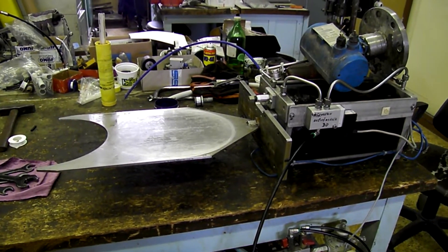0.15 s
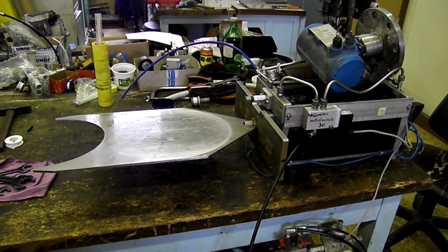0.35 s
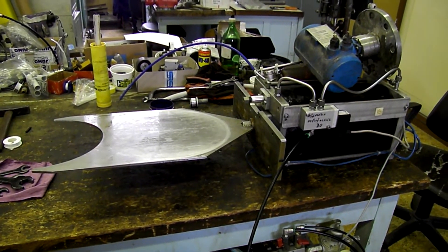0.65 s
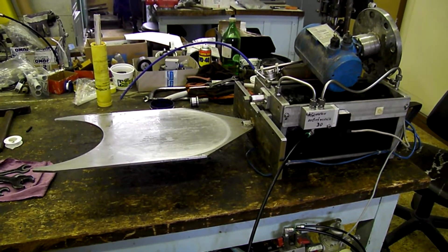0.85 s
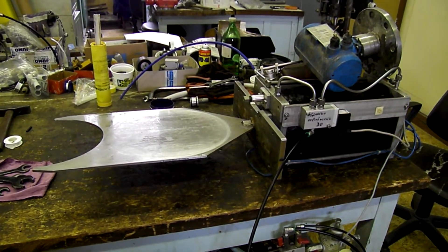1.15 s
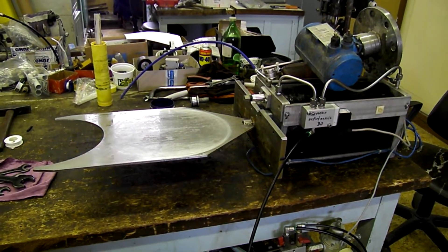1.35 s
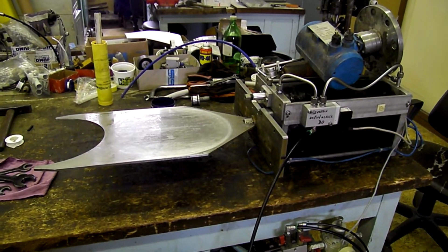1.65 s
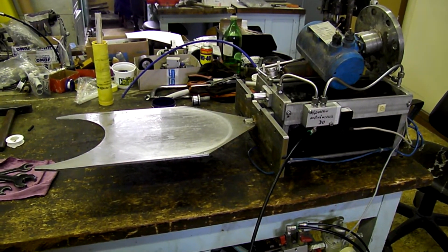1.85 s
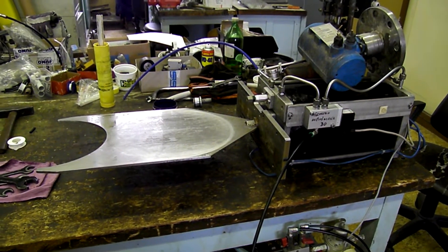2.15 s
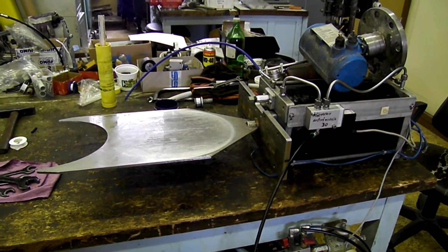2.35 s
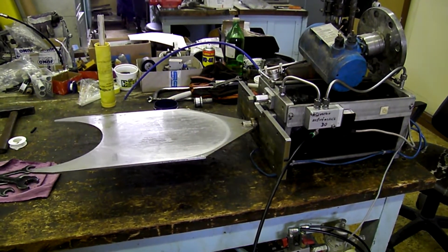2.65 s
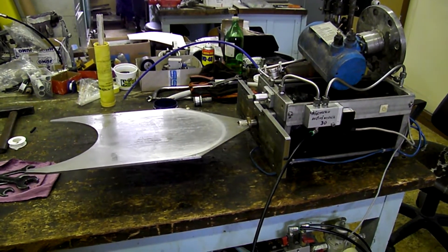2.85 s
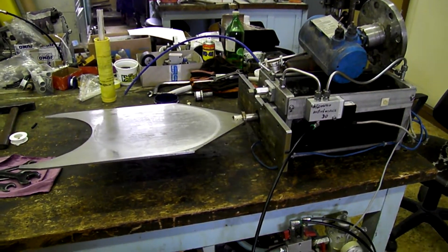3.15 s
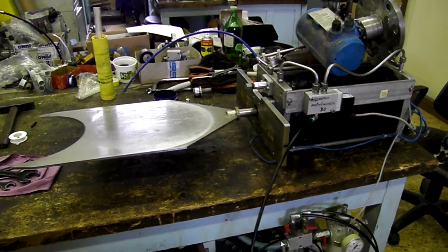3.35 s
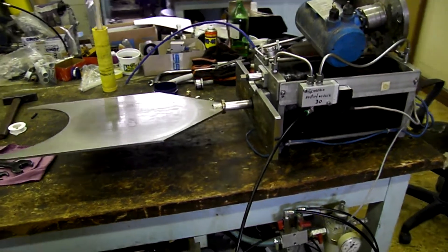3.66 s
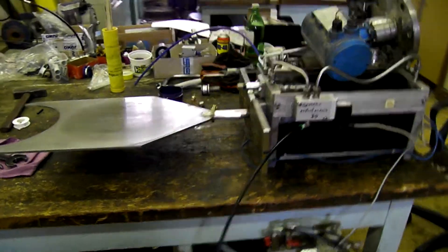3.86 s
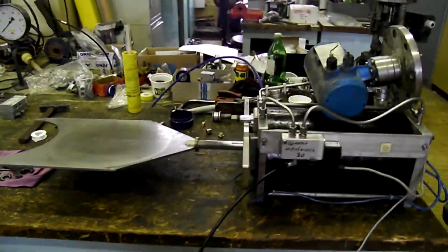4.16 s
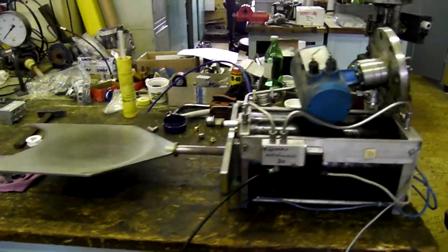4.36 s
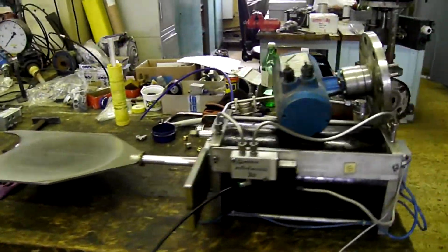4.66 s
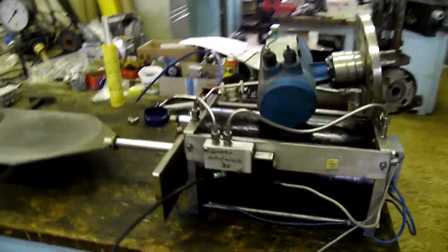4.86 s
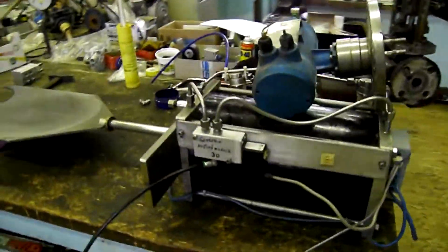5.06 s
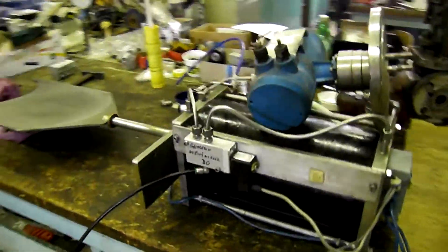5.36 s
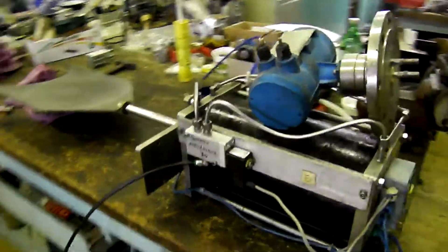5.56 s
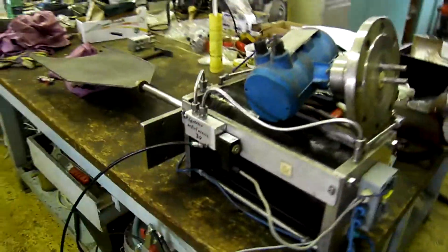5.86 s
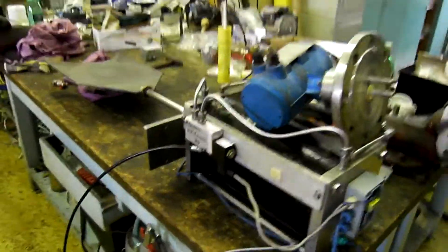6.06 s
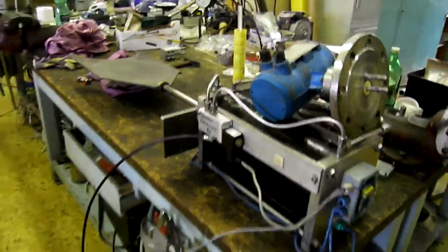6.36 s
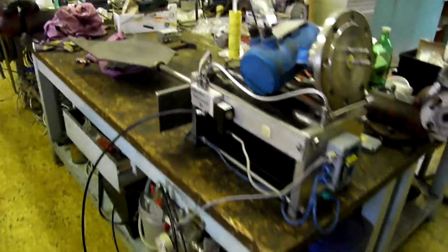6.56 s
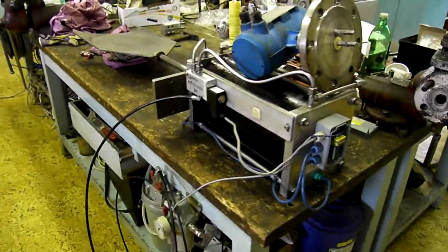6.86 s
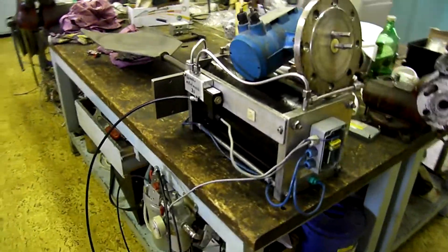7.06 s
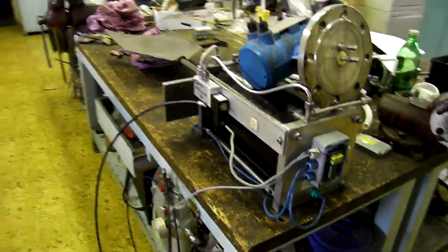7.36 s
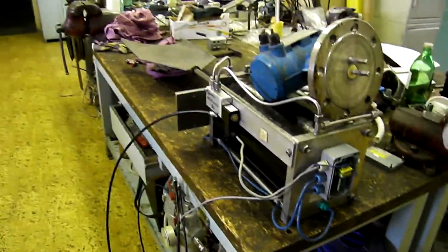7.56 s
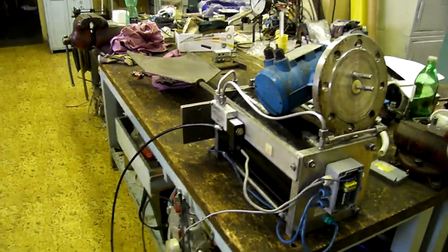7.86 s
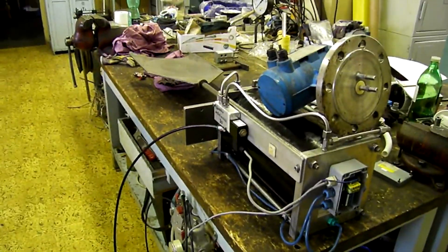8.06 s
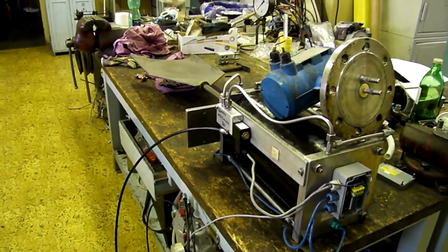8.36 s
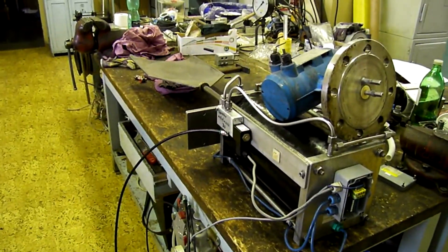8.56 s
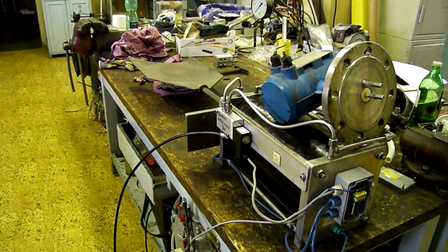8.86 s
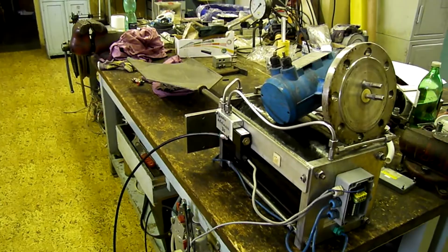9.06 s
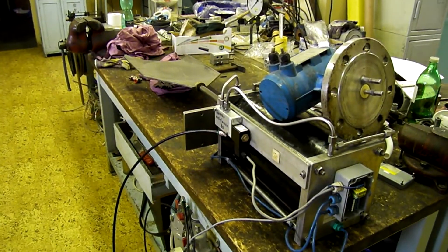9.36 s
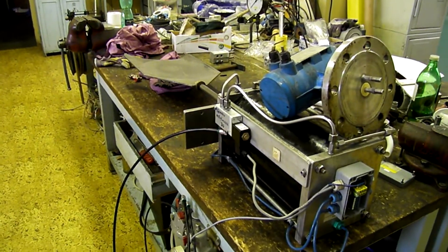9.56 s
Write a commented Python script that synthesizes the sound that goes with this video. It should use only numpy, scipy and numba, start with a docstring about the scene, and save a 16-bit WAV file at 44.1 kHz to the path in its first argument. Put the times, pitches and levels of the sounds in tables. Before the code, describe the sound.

Compressed air bleeds softly from a bench machine with small linkage clicks, against the steady rush of a workshop. After short puffs and a hard valve snap, a loud hissing blast covers the room while the microphone circles nearby. It falls away with a brief ring of pipes. The shop noise returns with breathy whistles, a faint high leak and two low swells near the end.

```python
"""A pneumatic rig cycles on a bench in a noisy, humming workshop. First the last air of one stroke
sighs out, ringing the pipes, while ports whistle and the linkage clicks. Near 2 s come puffs and a
valve click; then a turbulent jet blasts for four seconds as the microphone is carried round it, and a
limiter ducks the shop under the blast. The valve shuts, the hiss dulls with the falling pressure, and
whistles come and go. A thin leak remains, and a low roar swells twice near the end."""
import sys
import numpy as np
from scipy import signal
from scipy.fft import rfft, irfft
from scipy.io import wavfile
from scipy.ndimage import uniform_filter1d
from numba import njit

SR = 44100
rng = np.random.default_rng(int(sys.argv[2]) if len(sys.argv) > 2 else 0)


def wav_record(signal):
    """Record a signal, one row per channel, as 16-bit PCM in the file named by sys.argv[1]."""
    frames = np.transpose(np.atleast_2d(signal))
    bounded = np.clip(frames, -1, 1)
    # unit amplitude maps onto the largest positive 16-bit level
    quanta = np.round(bounded * 32767).astype(np.int16)
    wavfile.write(sys.argv[1], SR, quanta)


N = 428652
TIME = np.arange(N) / SR
FRAME_S, BIN_HZ = np.arange(N // 256 + 5) * 256 / SR, np.fft.rfftfreq(1024, 1 / SR)

# Noise spectra. Each row: frequency in Hz, relative spectral density in dB.
BLEED_SPECTRUM = [(150, -30), (600, -13), (1100, -12.5), (1800, -0.5), (2800, 2), (4200, 2), (6000, 0),
                  (8000, -8), (11000, -18), (15500, -37)]
SHOP_SPECTRUM = [(15, -67), (25, -52), (116, -26.5), (152, -19), (291, -1.5), (413, -6.5), (788, -2),
                 (1500, -6.5), (2440, -8), (3380, -11.5), (4420, -11.5), (6630, -19.5), (7580, -20),
                 (8450, -24), (15700, -38)]
JET_SPECTRUM = [(30, -39), (150, -35), (350, -28), (750, -14), (1050, -14.5), (1280, -8.5), (1500, -10),
                (2400, -6), (3900, -2.5), (5200, 0.5), (6500, -1), (9500, -4), (14200, -6), (15700, -6)]
LEAK_SPECTRUM = [(3000, -20), (7000, -22), (12000, 8), (15700, 5.5)]
ROAR_SPECTRUM = [(30, -34), (95, -36), (160, -8), (300, 1), (600, -1), (1200, -5.5), (2600, -12),
                 (5000, -21), (10000, -39)]
# Low-pressure air bleeding through the pipes. Each row: start in s, attack in s, time open in s,
# level in dB, emptying time in s, drive on the pipes in dB above the hiss.
SIGHS = [(-.05, .02, .42, -29, 0.8, 0), (.37, .02, .5, -44, .45, 10), (.66, 0.018, .7, -32, .3, -3),
         (1.75, .02, .2, -32.5, .15, -12), (2.016, .025, .3, -19, 0.13, -1.5),
         (6.177, .048, 3, 0.5, .24, 4)]
# Pipe resonances. Each row: frequency in Hz, half-width in Hz, relative level in dB.
PIPE_MODES = [(1717, 50, -8), (1877, 34, -1.5), (2015, 27, -10), (2176, 35, -7.5), (2370, 56, -4),
              (2510, 35, -8.5), (2980, 68, -5), (3195, 18, -11.5), (3640, 39, -9.5)]
# The level of the shop's rush over time. Each row: time in s, level in dB.
SHOP_LEVELS = [(2.3, -27), (6.15, -33.5), (6.3, -22), (7.3, -20.5), (9.7, -24)]
# Whistling ports. Each row: time of peak in s, rise in s, fade in s, frequency in Hz, level in dB.
PORT_WHISTLES = [(.15, .3, .5, 1850, -33), (.3, .12, .12, 2480, -35), (.22, .2, .3, 3100, -36),
                 (6.53, .2, .2, 3200, -27), (6.6, .2, .45, 6980, -34), (6.7, .13, .13, 1700, -29),
                 (6.78, .15, .25, 1881, -24), (6.82, .15, .25, 3660, -27.5), (6.88, .22, .22, 3020, -28),
                 (6.87, .11, .13, 13400, -38), (7.05, .2, .2, 12620, -42), (7.17, .6, .8, 7720, -36.5),
                 (7.27, .25, .4, 2375, -25.5), (7.4, .5, .5, 4530, -33), (7.44, .03, .42, 5020, -29),
                 (8.05, .77, .77, 3750, -34.5), (8.07, .52, .52, 4400, -35), (8.04, .27, .27, 7430, -44),
                 (9.68, .02, .04, 4400, -37)]
# Shop hums. Each row: time of peak in s, half-length in s, frequency in Hz, half-width in Hz, level in dB.
SHOP_HUMS = [(.14, 0.29, 367, 25, -33.5), (1.2, 0.52, 588, 15, -37.5), (1.87, 0.32, 356, 12, -36.5),
             (7.2, 1.5, 277, 54, -44), (7.57, 1.16, 780, 100, -32), (7.8, 2.3, 164, 11, -44.5)]
# Valve and linkage impacts. Each row: start in s, crack level in dB, crack decay in s,
# thump level in dB, top of the crack's band in Hz.
VALVE_CLICKS = [(.364, -19, .005, -50, 3200), (.711, -19, .008, -50, 3000), (2.016, -18, .008, -40, 3200),
                (2.2385, -15, .002, -10, 6500), (2.2577, -1, .004, 6, 4200)]
# Modes of the rig's frame. Each row: frequency in Hz, time to fall 60 dB in s, relative level in dB.
FRAME_MODES = [(260, .05, -9), (430, .035, -4), (690, .025, -1), (1350, .015, -6)]
# Puffs from the jet's port. Each row: start in s, hold in s, level in dB, fall in dB per second.
PUFFS = [(2.023, .004, -17, 150), (2.236, .02, -18, 300), (6.162, .03, -4.5, 110)]
# Bands beamed or shaded as the jet glances off the frame. Each row: centre in Hz before sliding,
# half-width in Hz, gain in dB, aim in degrees, spread in degrees.
JET_BEAMS = [(2330, 700, 7, 41, 32), (3400, 1200, 5.3, 15, 18), (4550, 450, -2, 38, 18),
             (5390, 470, 7, 28, 19), (5800, 200, 4.5, 53, 5), (6400, 400, 4.3, 27, 13),
             (7150, 400, 6.3, 49.5, 7.5), (7726, 300, 5.8, 27, 15), (8300, 600, 2.5, 0, 6),
             (9500, 600, -2, 0, 35), (12400, 430, 5.3, 25, 40), (13250, 380, -2.5, 15, 40),
             (14208, 480, 4.5, 0, 40), (14208, 500, 7, 50, 16), (15700, 450, -4.5, 15.5, 4),
             (15729, 455, 5.6, 20, 4), (16800, 500, 6.5, 38.5, 4), (16150, 500, 7.5, 44, 3.5),
             (15800, 350, 4, 52, 5)]
# The bands slide together as the glancing path changes. Each row: time in s, frequency ratio.
BEAM_SLIDE = [(3.5, 1), (4.2, .921), (4.8, .898), (5.7, .893), (6.15, .962)]
# The leak left after the stroke. Each row: time in s, level in dB.
LEAK_LEVELS = [(6.3, -70), (6.7, -37), (7.5, -44), (9.7, -43.5)]
# Swells of the low roar. Each row: start in s, hold in s, level in dB.
ROAR_SWELLS = [(8.52, .02, -17.5), (9.18, .07, -17)]


def amp(db):
    """Amplitude grows tenfold for every 20 dB."""
    return 10 ** (np.asarray(db) / 20)


def unit(x):
    """Normalisation to an rms of 1."""
    return x / np.sqrt(np.mean(x ** 2) + 1e-20)


def bell(x, centre, width):
    """A Gaussian weight: 1 at the centre, 1/e one width away."""
    return np.exp(-((x - centre) / width) ** 2)


def envelope(start, attack, hold, fall_db_per_s):
    """A linear attack, a hold and an exponential decay."""
    age = TIME - start
    return np.clip(age / attack, 0, 1) * amp(-abs(fall_db_per_s) * np.maximum(age - attack - hold, 0))


def follow(rows, t):
    """Linear interpolation of a curve at the times t."""
    times, values = np.transpose(rows)
    return np.interp(t, times, values)


def colour(points):
    """A spectrum in dB at every bin, interpolated on a log-frequency axis."""
    hz, db = np.transpose(points)
    return np.interp(np.log(BIN_HZ + 1), np.log(hz + 1), db)


def flutter(slow_hz, fast_hz):
    """Sines of random phase add to a slow fluctuation of rms 1, one value a frame."""
    rates = np.geomspace(slow_hz, fast_hz, 30)
    return unit(sum(np.sin(2 * np.pi * (hz * FRAME_S + rng.random())) / hz ** .25 for hz in rates))


def turbulence(shape_db, patchy_db, flutter_db):
    """Turbulent noise of rms 1: eddies modulate its spectrum in patches and its level as a flutter."""
    real, imag, patches = rng.standard_normal((3, len(FRAME_S), len(BIN_HZ)))
    patches = unit(uniform_filter1d(uniform_filter1d(patches, size=10, axis=0), size=16, axis=1))
    shape = amp(shape_db) * np.ones_like(real)
    shape /= np.linalg.norm(shape, axis=1, keepdims=True)
    eddies = amp(patchy_db * patches + flutter_db * flutter(2, 30)[:, None])
    spectra = (real + 1j * imag) * shape * eddies
    return unit(signal.istft(spectra.T, nperseg=1024, noverlap=768)[1][:N])


def resonance(hz, width):
    """A resonator driven by noise passes a narrow band: a fuzzy tone of rms 1."""
    detune = (np.fft.rfftfreq(N, 1 / SR) - hz) / width
    return unit(irfft(rfft(rng.standard_normal(N)) / (1 + detune ** 2), N))


def sighs(flow_exponent=1.956, best_drive_db=-9, full_db_per_octave=2.0, empty_db_per_octave=-1.2):
    """Emptying chambers: the flow dies as a power of time, its hiss dulls, and the pipes resonate."""
    flow_power, drive_power, fullness = 1e-12, 0, 0
    for start, attack, open_s, db, empty_s, drive_db in SIGHS:
        pressure = 1 / (1 + ((TIME - start) / empty_s) ** 2)
        valve = envelope(start, attack, open_s, fall_db_per_s=200)
        flow = amp(db) * valve * pressure ** (flow_exponent / 2)
        flow_power += flow ** 2
        drive_power += (amp(drive_db) * flow) ** 2
        fullness += pressure * flow ** 2
    mean_pressure = np.interp(FRAME_S, TIME, fullness / flow_power)
    tilt = empty_db_per_octave + (full_db_per_octave - empty_db_per_octave) * mean_pressure
    shape_db = colour(BLEED_SPECTRUM) + tilt[:, None] * np.log2(BIN_HZ + 100)
    hiss = np.sqrt(flow_power) * turbulence(shape_db, patchy_db=1.3, flutter_db=0.5)
    ring = unit(sum(amp(db) * resonance(hz, width) for hz, width, db in PIPE_MODES))
    drive = np.sqrt(drive_power)
    choke = 1 + (drive / amp(best_drive_db)) ** 2  # harder blowing chokes the pipes
    return hiss + drive / choke * ring


def seep(level_db=-37.5, tilt_db_per_octave=-2.0):
    """Air that always seeps through makes a dull turbulent hiss."""
    shape_db = colour(BLEED_SPECTRUM) + tilt_db_per_octave * np.log2(BIN_HZ + 100)
    return amp(level_db) * turbulence(shape_db, patchy_db=0.8, flutter_db=0.9)


def shop_rush():
    """Broadband ambient noise: it sinks during the blast, returns louder afterwards, then eases."""
    rush = turbulence(colour(SHOP_SPECTRUM), patchy_db=-0.08, flutter_db=0.75)
    return amp(follow(SHOP_LEVELS, TIME)) * rush


def port_whistles(pitch_over_width=110):
    """Noise-driven resonance: breathy whistles, each swelling and fading at its own time and pitch."""
    return sum(amp(db) * bell(TIME, peak, np.where(TIME < peak, rise, fade))
               * resonance(hz, hz / pitch_over_width) for peak, rise, fade, hz, db in PORT_WHISTLES)


def shop_hums():
    """Narrow bands of low noise are heard as hums that swell and fade."""
    return sum(amp(db) * bell(TIME, peak, half_length) * resonance(hz, width)
               for peak, half_length, hz, width, db in SHOP_HUMS)


def valve_clicks():
    """Each impact gives a metallic crack and excites the damped modes of the frame."""
    out, t = np.zeros(N), np.arange(SR // 8) / SR
    thump = sum(amp(db - 60 * t / t60) * np.cos(2 * np.pi * hz * t) for hz, t60, db in FRAME_MODES) / 2
    for start, crack_db, decay, thump_db, top_hz in VALVE_CLICKS:
        band = signal.butter(2, [1400, top_hz], "band", fs=SR, output="sos")
        crack = unit(signal.sosfilt(band, rng.standard_normal(len(t)))) * np.exp(-t / decay)
        out[round(start * SR):][:len(t)] += amp(crack_db) * crack + amp(thump_db) * thump
    return out


def bearing(t, start_s=3.36, deg_per_s=19.8):
    """Uniform circular motion: the degrees the microphone has moved round the rig."""
    return deg_per_s * np.maximum(t - start_s, 0)


def jet(open_s=2.257, shut_s=6.165, rise_s=0.045, shut_db_per_s=1100,
        off_axis_db=14.5, sag_db_per_s=1.7, axis_gain_db=14, aim_deg=21.4, spread_deg=20):
    """Jet noise in puffs and one blast. It is directional, so its beams sweep past the microphone."""
    hz = BIN_HZ / follow(BEAM_SLIDE, FRAME_S)[:, None]
    angle = bearing(FRAME_S)[:, None]
    beams_db = sum(db * bell(hz, centre, width) * bell(angle, aim, spread)
                   for centre, width, db, aim, spread in JET_BEAMS)
    age = np.maximum(TIME - open_s, 0)
    valve = np.minimum(age / rise_s, 1) ** .4 * amp(-shut_db_per_s * np.maximum(TIME - shut_s, 0))
    supply_db = off_axis_db - sag_db_per_s * age  # the supply pressure sags
    directivity_db = axis_gain_db * bell(bearing(TIME), aim_deg, spread_deg)
    blast = valve * amp(supply_db + directivity_db)
    puffs = sum(amp(db) * envelope(start, 0.0056, hold, fall) for start, hold, db, fall in PUFFS)
    return (blast + puffs) * turbulence(colour(JET_SPECTRUM) + beams_db, patchy_db=0.28, flutter_db=0.67)


def leak():
    """Turbulence at a small leak leaves a thin, high hiss after the stroke."""
    hiss = turbulence(colour(LEAK_SPECTRUM), patchy_db=.8, flutter_db=.3)
    return amp(follow(LEAK_LEVELS, TIME)) * hiss


def roar(attack_s=0.2, fall_db_per_s=32):
    """Low-frequency noise swells and decays exponentially."""
    swells = sum(amp(db) * envelope(start, attack_s, hold, fall_db_per_s)
                 for start, hold, db in ROAR_SWELLS)
    return swells * turbulence(colour(ROAR_SPECTRUM), patchy_db=1.0, flutter_db=0.5)


def bench_echoes(direct, echo_db=-15, decay_s=0.027, count=60):
    """Early reflections off the cluttered bench interfere with the direct sound and ripple its spectrum."""
    delay_s = rng.uniform(.0015, .035, count)
    taps = np.zeros(SR // 8)
    taps[(delay_s * SR).astype(int)] = rng.choice([-1, 1], count) * np.exp(-delay_s / decay_s)
    echoes = signal.oaconvolve(direct, taps / np.linalg.norm(taps))[:N]
    return (direct + amp(echo_db) * echoes) / np.hypot(1, amp(echo_db))


def scene():
    """Superposition: all sources add at one microphone, which feeds both channels."""
    noises = jet() + sighs() + seep() + shop_rush() + roar() + leak()
    mono = bench_echoes(noises) + port_whistles() + shop_hums() + valve_clicks()
    return np.array([mono, mono])


@njit
def chase(target, attack, release):
    """An envelope follower: a first-order lag that rises quickly and falls slowly."""
    out, held = np.zeros(len(target)), 0.
    for i in range(len(target)):
        held += (target[i] - held) * (attack if target[i] > held else release)
        out[i] = held
    return out


def record(dry, limit_db=-18.0, slope=0.92, attack_s=0.0042, release_s=0.046, emphasis=0.41,
           notch_hz=7880, cutoff_hz=15800):
    """Limiting: gain falls as treble-weighted power rises. A narrow notch and a low-pass follow."""
    sensed = signal.lfilter([1, -emphasis], [1], dry[0])
    power = signal.lfilter([1 / 100], [1, 1 / 100 - 1], sensed ** 2)  # mean over about 100 samples
    excess_db = np.maximum(10 * np.log10(power + 1e-12) - limit_db, 0)
    duck_db = slope * chase(excess_db, 1 / (attack_s * SR), 1 / (release_s * SR))
    clipped = np.clip(dry * amp(-duck_db), -.87, .87)  # overload before the limiter reacts
    notched = signal.lfilter(*signal.iirnotch(notch_hz, 40, fs=SR), clipped)
    low_pass = signal.firwin(511, cutoff_hz, window=("kaiser", 8), fs=SR)
    return signal.oaconvolve(notched, low_pass[None], "same")


dry = scene()
out = record(dry)
wav_record(out)
```